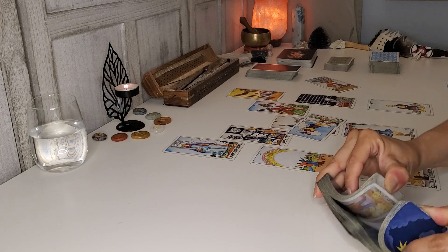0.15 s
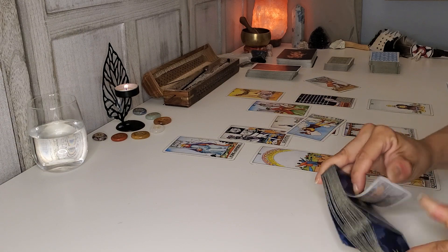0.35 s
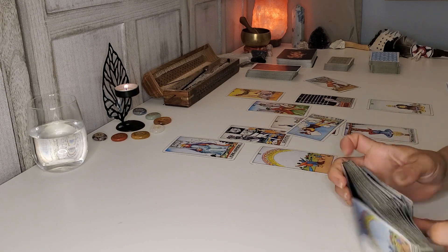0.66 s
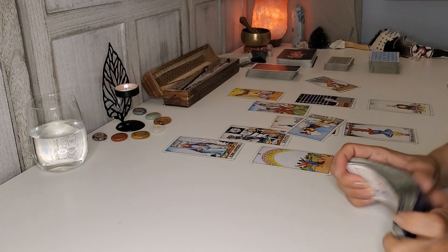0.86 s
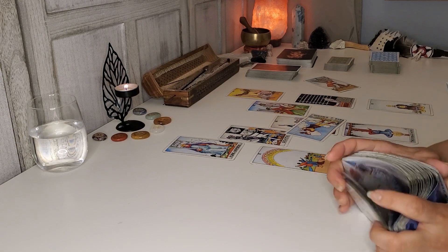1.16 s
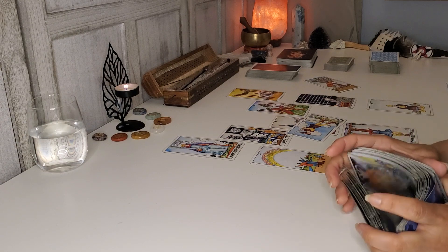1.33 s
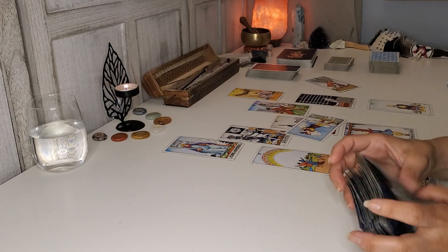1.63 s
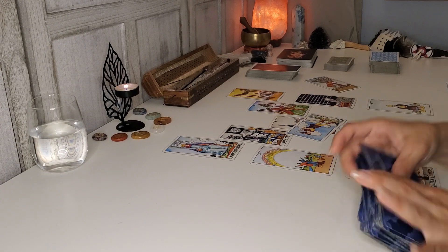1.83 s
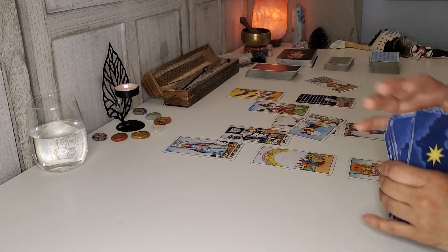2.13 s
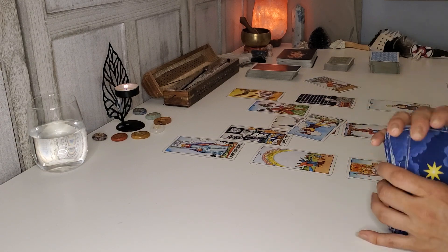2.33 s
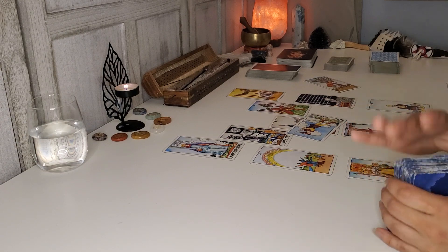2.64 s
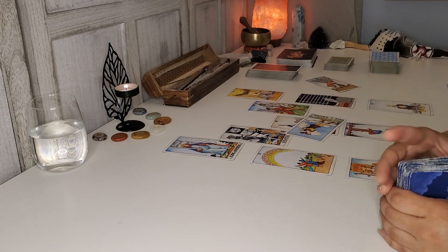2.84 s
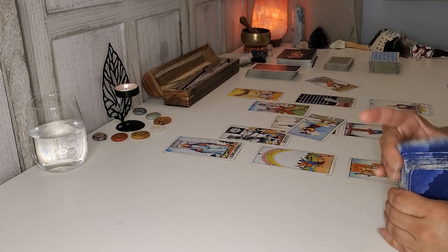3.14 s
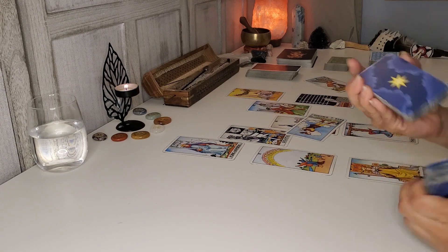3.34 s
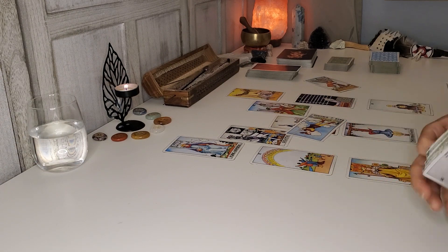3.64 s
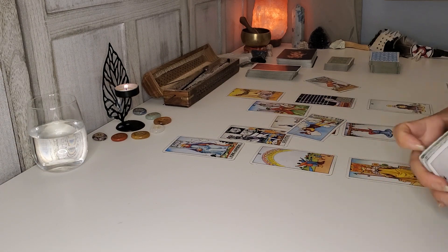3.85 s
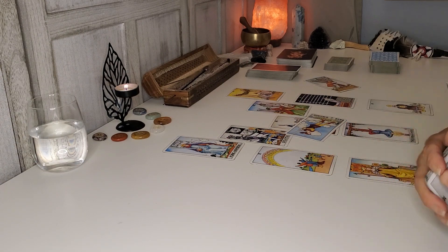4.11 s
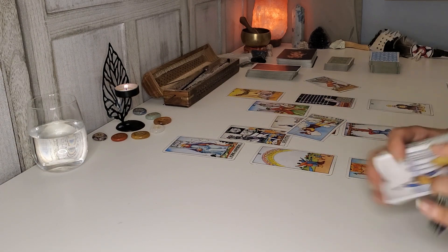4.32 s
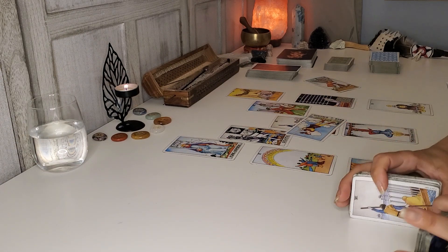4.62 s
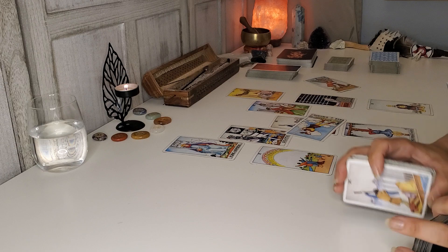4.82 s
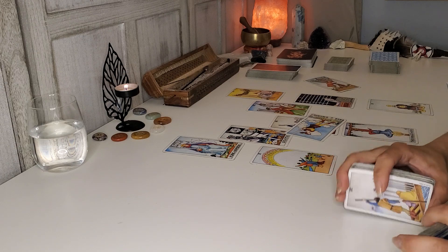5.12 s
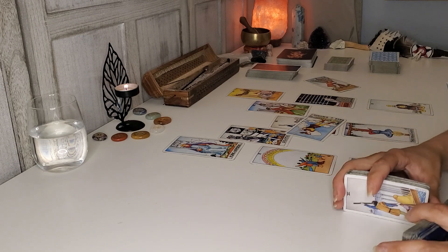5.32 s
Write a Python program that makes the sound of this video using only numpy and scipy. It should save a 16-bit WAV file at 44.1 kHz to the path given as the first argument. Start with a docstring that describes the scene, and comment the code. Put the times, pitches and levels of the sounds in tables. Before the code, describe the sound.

Close stereo pickup of hands shuffling stiff cards at a table in a small furnished room. A loud crisp riffle comes first, then a knock, a much softer bridge flutter, small squaring taps, a quiet pause, and more taps ending in hard sharp raps. A faint low appliance hum and soft room air lie beneath.

```python
"""A deck of stiff cards is riffled, bridged, squared and knocked on a table top in a small furnished room.
Card edges, sliding faces and raps are all made of short noisy slips; each edge and rap also has one snap.
The raps make a few table tones ring. Random echoes make the room; soft noise is its air.
An appliance hums far off as two wavering tones. Two spaced microphones hear the hands move side to side."""
import sys
import numpy as np
from scipy import signal
from scipy.fft import rfft, irfft
from scipy.io import wavfile
from scipy.ndimage import uniform_filter1d

SR = 44100
rng = np.random.default_rng(int(sys.argv[2]) if len(sys.argv) > 2 else 0)


def generate_wav(sig):
    """Save sig (samples, or channels by samples) to the path in sys.argv[1] as 16-bit PCM at SR."""
    pcm = np.round(np.clip(np.atleast_2d(sig).T, -1, 1) * 32767).astype(np.int16)
    wavfile.write(sys.argv[1], SR, pcm)


N = 241353

# Cards sliding, first the riffle, then the bridge falling shut; for each a curve of: start_s, rustle_db
SLIDE_CURVES = [
    [(0, -31.5), (.16, -35.5), (.26, -30), (.33, -43.5), (.4, -23), (.47, -36), (.53, -52)],
    [(1.08, -55.5), (1.2, -50.5), (1.36, -46.5), (1.5, -50.5), (1.65, -48.5), (1.79, -63)],
]
# Card edges let go by the thumb: start_s, level_db (of the middle part)
EDGE_FLICKS = [(0.0234, -22), (0.0662, -22.5), (0.0717, -27.5), (0.122, -28), (0.162, -30), (0.176, -20),
               (0.2123, -20), (0.2474, -21), (0.2676, -25.5), (0.274, -26), (.334, -26), (0.353, -30),
               (0.3711, -22), (0.4814, -23.5), (1.1012, -38.5), (1.16, -46.5), (1.1979, -60), (1.253, -38),
               (1.322, -36), (1.336, -37.5), (1.3738, -40), (1.4093, -46), (1.508, -47), (1.597, -52),
               (1.649, -51), (1.6751, -40.5), (1.6967, -44)]
# The pack raps the table or the palm: start_s, crack_db, dull_db, fade_s
PACK_RAPS = [(0.0297, -18, -24.5, 0.0059), (0.1456, -24, -36, .003), (0.198, -19.5, -27, 0.0048),
             (0.6603, -51, -45, 0.036), (0.698, -44, -42.5, 0.03), (0.7362, -16.5, -37.5, 0.0026),
             (1.235, -46, -39.5, 0.011), (1.51, -43, -42.5, 0.0092), (2.293, -38, -30.5, 0.014),
             (2.312, -23, -35, 0.005), (2.356, -34.5, -34, 0.016), (2.393, -32.5, -32.5, 0.0047),
             (2.478, -38.5, -37, 0.0098), (2.501, -26.5, -37, 0.047), (2.541, -24, -25.5, 0.01),
             (2.7416, -55, -42, 0.0041), (2.7832, -37, -35, 0.0052), (4.544, -36, -28.5, 0.0061),
             (4.56, -24.5, -26.5, 0.0095), (4.643, -26.5, -37.5, 0.011), (4.7092, -45, -32.5, 0.015),
             (4.735, -25, -31.5, 0.0039), (4.746, -25.5, -38.5, 0.0059), (4.8212, -32, -49, 0.0051),
             (5.009, -64, -50, 0.0054), (5.028, -55, -38, 0.043), (5.0749, -9, -23.5, 0.0062),
             (5.0884, -12.5, -23, 0.0038), (5.3193, -26.5, -22.5, 0.0085), (5.326, -14.5, -30.5, 0.0075)]
# Fingers brush the cards: middle_s, rustle_db, hiss_db, length_s
FINGER_BRUSHES = [(0.803, -62.5, -67, 0.41), (0.966, -58, -57, .15), (1.876, -59.5, -59.5, 0.066),
                  (2.132, -70.5, -67.5, 0.15), (2.545, -52, -53.5, 0.063), (2.697, -65, -72, 0.27),
                  (3.123, -83.5, -101.5, 0.2), (3.393, -61, -62, 0.057), (3.619, -76.5, -75.5, 0.14),
                  (3.932, -74, -81, .05), (4.158, -67.5, -69.5, 0.064), (4.887, -53, -64, 0.048)]
# Hands shift on the table: middle_s, rumble_db, length_s
HAND_SHIFTS = [(0.166, -36, 0.21), (0.424, -33, 0.15), (.9, -66, 0.52), (1.234, -54.5, 0.29),
               (1.6, -60.5, 0.53), (2.43, -57.5, 0.24), (2.945, -62, 0.86), (4.735, -46, 0.24)]
# Tones that ring in the table and pack: pitch_hz, relative_level_db, time_to_fall_60_db_s
TABLE_TONES = [(86.7, -1, 0.14), (250, -11, 0.11), (372, -12.5, 0.15), (505, -12, 0.033), (602, 6.5, 0.036),
               (847, -10.5, 0.053)]
# Where the hands are: start_s, left_microphone_delay_ms (below zero, the left hears them first)
HAND_SIDE = [(0, .18), (1.95, .18), (2.25, -.29), (3.1, -.29), (3.3, .22), (4.3, .22), (4.5, -.29)]
# How long the room rings: pitch_hz, time_to_fall_60_db_s
ROOM_RING = [(100, 0.56), (420, 0.32), (1100, 0.3), (2900, 0.28), (7700, 0.33), (15000, 0.3)]
# Loudness of the far hum: start_s, low_tone_db, high_tone_db
HUM_LEVELS = [(0, -51, -51), (1.3, -48.5, -57.5), (2.2, -65.5, -57), (2.7, -50.5, -57), (3.3, -46.5, -58.5),
              (4.0, -51.5, -60.5), (4.5, -59, -60), (5.47, -61, -57.5)]

# Tone colours; only the shape counts. Columns in each: pitch_hz, relative_level_db (per Hz)
# Rustle of the pack
RUSTLE_COLOUR = [(400, -21.5), (800, -7), (2000, -7), (4000, -5.5), (6000, -10.5), (8600, -25.5),
                 (14000, -34)]
# Hiss of card faces, also the sharp part of a flick
FACE_COLOUR = [(4000, -19), (7000, 1.5), (8000, -0.5), (10000, -1), (13000, -1), (16500, -2)]
# Crack of a rap
CRACK_COLOUR = [(400, -24.5), (800, -4), (2300, -5), (4000, -14.5), (6000, -26.5), (8000, -41),
                (16000, -48)]
# Dull thud and hand rumble
RUMBLE_COLOUR = [(30, -49), (50, -15.5), (90, 1.5), (240, 0.5), (500, 0.5), (900, -4), (1500, -13),
                 (3000, -40)]
# Air of the room
AIR_COLOUR = [(25, -14.5), (60, -1), (130, -9.5), (240, -7.5), (340, -15.5), (900, -23), (1600, -33),
              (5000, -43.5), (6600, -39), (8000, -44), (16000, -47)]

FLICK_FADE_S, FLICK_RISE_S, RAP_RISE_S = 0.0013, 0.000077, 0.00074
FLICK_DULL_DB, FLICK_SHARP_DB = -18, -1   # against the middle part
SNAP_AFTER_S, FLICK_SNAP, RAP_SNAP = .0012, 22, 11   # snap heights are against the slips
FULL_SNAP_FADE_S = 0.005   # contacts that fade slower than this are softer: a weaker snap
SMALL_FLICKS_PER_S = 70   # while cards slide
SMALL_FLICK_DB, SMALL_FLICK_SPREAD_DB = 5.5, 13.5   # the strongest against the rustle; range below it
SLIDE_HISS_DB = -8   # against the rustle
FIDGET_MS = .03   # the hands never keep quite still
SPACING_M = 0.19   # between the microphones
ROOM_DB, AIR_DB = 1, -59
NEAR_ECHO_DB, NEAR_ECHO_FADE_S = 3, 0.014   # the table and the nearest wall answer first
HUM_LOW_HZ, HUM_HIGH_HZ = 59.3, 240
CUTOFF_HZ = 16500


def sliding():
    """Sliding cards rustle, their faces hiss and the hands rumble: three colours of uneven noise."""
    t = np.arange(N) / SR
    pressure = np.zeros(N)
    for rows in SLIDE_CURVES:
        while_sliding = (t >= rows[0][0]) * (t < rows[-1][0])
        pressure += from_db(in_time(rows)[0]) * while_sliding
    rustle = pressure * scratchy(2.4, 6.0)
    hiss = pressure * from_db(SLIDE_HISS_DB) * scratchy(1.5, 0.87)

    brush_rustle, brush_hiss = np.zeros((2, N))
    for middle_s, rustle_db, hiss_db, length_s in FINGER_BRUSHES:
        brush = swell(middle_s, length_s)
        brush_rustle += from_db(rustle_db) * brush
        brush_hiss += from_db(hiss_db) * brush
    rustle += brush_rustle * scratchy(2.9, 1.2)
    hiss += brush_hiss * scratchy(1.5, 1.1)

    shifts = sum(from_db(db) * swell(middle_s, length_s) for middle_s, db, length_s in HAND_SHIFTS)
    rumble = shifts * scratchy(0.34, 1.1)
    return colour(rustle, RUSTLE_COLOUR) + colour(hiss, FACE_COLOUR) + colour(rumble, RUMBLE_COLOUR)


def flicking():
    """Card edges flick past the thumbs, each with a middle, a dull and a sharp part."""
    events = []
    for s, db in list(EDGE_FLICKS) + small_flicks():
        events.append((s, FLICK_FADE_S, db, db + FLICK_DULL_DB, db + FLICK_SHARP_DB))
    return contacts(events, FLICK_RISE_S, RUSTLE_COLOUR, FLICK_SNAP)


def small_flicks():
    """Lesser card edges go at random moments while the cards slide."""
    flicks = []
    for rows in SLIDE_CURVES:
        s, db = np.transpose(rows)
        duration = s[-1] - s[0]
        moment, weakness = rng.random((round(SMALL_FLICKS_PER_S * duration), 2)).T
        when = s[0] + moment * duration
        level_db = np.interp(when, s, db) + SMALL_FLICK_DB - SMALL_FLICK_SPREAD_DB * weakness
        flicks += zip(when, level_db)
    return flicks


def rapping():
    """The pack raps the table or the palm, with a crack and a dull part."""
    events = [(s, fade_s, crack_db, dull_db) for s, crack_db, dull_db, fade_s in PACK_RAPS]
    return contacts(events, RAP_RISE_S, CRACK_COLOUR, RAP_SNAP)


def contacts(events, rise_s, spectrum, snap):
    """Each contact is a dying burst of slips with one snap in it; its dull part drives the table."""
    force = np.zeros((3, N))   # middle, dull, sharp
    t = np.arange(2400) / SR
    for s, fade_s, *levels_db in events:
        start, parts = round(s * SR), len(levels_db)
        shape = (1 - np.exp(-t / rise_s)) * np.exp(-t / max(fade_s, .0003))
        burst = slips(shape, parts)
        snap_height = snap * min(1, FULL_SNAP_FADE_S / fade_s)
        burst[:, round(SNAP_AFTER_S * SR)] += snap_height * rng.choice([-1, 1])
        force[:parts, start:start + len(t)] += from_db(levels_db)[:, None] * burst
    middle, dull, sharp = force
    return colour(middle, spectrum) + table_top(dull) + colour(sharp, FACE_COLOUR)


def slips(shape, count):
    """Bursts of slips that follow a shape, evened out so that no pitch stands out."""
    burst = shape * rng.standard_normal((count, len(shape)))
    for _ in range(3):
        spectrum = rfft(burst)
        burst = irfft(spectrum / (np.abs(spectrum) + 1e-12), len(shape))   # all pitches equal
        size = np.sqrt(uniform_filter1d(burst ** 2, size=64) + 1e-12)
        burst = shape * burst / size   # back to the shape
    return burst


def scratchy(spread_db, lumps_db):
    """Dense uneven slips of card on card, coming in lumps."""
    uneven_db = spread_db * np.minimum(rng.exponential(1, N), 5)
    sizes = from_db(uneven_db + lumps_db * drift(56))
    return rms_one(sizes * rng.standard_normal(N))


def table_top(force):
    """The table and the pack ring briefly at a few pitches, over a dull thud."""
    out = colour(force, RUMBLE_COLOUR)
    for hz, level_db, t60 in TABLE_TONES:
        r = from_db(-60 / (t60 * SR))   # what is left after one sample
        w = 2 * np.pi * hz / SR
        ring = signal.lfilter([0, np.sin(w)], [1, -2 * r * np.cos(w), r * r], force + 1e-18)
        out += from_db(level_db - 28) * ring
    return out


def two_microphones(cards):
    """Sound takes time to travel, so it reaches the nearer microphone first."""
    late_ms = in_time(HAND_SIDE)[0] + FIDGET_MS * drift(4)
    late = np.round(late_ms * SR / 1000).astype(int)
    left = cards[np.clip(np.arange(N) - late, 0, N - 1)]
    return np.array([left, cards])


def room(x, size=4000):
    """The cards keep moving, so about each tenth of a second meets another of twelve echo patterns."""
    out = np.zeros((2, N + SR))
    patterns = [echoes() for _ in range(12)]
    fade = np.sqrt(signal.windows.hann(2 * size, sym=False))   # neighbours overlap
    padded = np.pad(x, (size, 2 * size))
    for k, start in enumerate(range(0, N + size, size)):
        piece = padded[start:start + 2 * size] * fade
        wet = signal.fftconvolve(piece[None], patterns[k % 12], axes=1)
        out[:, start:start + wet.shape[1]] += wet
    return out[:, size:size + N]


def echoes():
    """Echoes from all sides: a strong early cluster, then a tail that dies at its own speed in each band."""
    t = np.arange(SR // 3) / SR
    edges = 40 * 2. ** np.arange(10)   # Hz, an octave apart
    noise, tail = diffuse(len(t)), 0
    for k, (low, high) in enumerate(zip(edges, edges[1:])):
        octave = signal.butter(2, [low, high], "band", fs=SR, output="sos")
        band = signal.sosfilt(octave, noise)
        fade = from_db(-60 * t / at_hz(ROOM_RING, np.sqrt(low * high)))
        tail = tail + (-1) ** k * band * fade   # signs alternate: no gaps between bands
    near = 1 + from_db(NEAR_ECHO_DB) * np.exp(-t / NEAR_ECHO_FADE_S)
    tail = tail * (1 - np.exp(-t / 0.00045)) * near
    return tail / np.sqrt(np.sum(tail ** 2) / 2)


def room_air():
    """Soft steady noise of the air, coming from all sides."""
    sides = diffuse(N + 1)[:, :N]   # one spare sample makes the length even
    return from_db(AIR_DB) * np.array([colour(side, AIR_COLOUR) for side in sides])


def diffuse(length):
    """White noise from all sides: alike at both microphones in the bass, unrelated in the treble."""
    hz = np.fft.rfftfreq(length, 1 / SR)
    alike = np.sinc(2 * hz * SPACING_M / 343)   # 343 m/s: speed of sound
    mid, side = rfft(rng.standard_normal((2, length)))
    shared = np.sqrt(.5 + alike / 2) * mid
    opposed = np.sqrt(.5 - alike / 2) * side * [[1], [-1]]
    return irfft(shared + opposed, length)


def hum():
    """A far appliance hums: two tones waver in level and pitch, the same at both microphones."""
    low_db, high_db = in_time(HUM_LEVELS)
    t = np.arange(N) / SR
    low_gain = from_db(low_db + 0.49 * drift(6))
    high_gain = from_db(high_db + 2.5 * drift(8))
    low = low_gain * np.sin(2 * np.pi * HUM_LOW_HZ * t + .25 * drift(3))
    high = high_gain * np.sin(2 * np.pi * HUM_HIGH_HZ * t + .6 * drift(2.4))
    return low + high


def swell(middle_s, length_s):
    """A smooth rise and fall around a moment."""
    return np.exp(-(2 * (np.arange(N) / SR - middle_s) / length_s) ** 2)


def drift(rate_hz):
    """Slow random wander with an rms of about 1."""
    r = np.exp(-2 * np.pi * rate_hz / SR)
    noise = rng.standard_normal(N + SR)
    return rms_one(signal.lfilter([1], [1, -2 * r, r * r], noise)[SR:])   # first second: settling


def colour(x, spectrum):
    """Filters to a tone colour without looking ahead (minimum phase); white noise keeps its rms."""
    gain = from_db(at_hz(spectrum, np.fft.rfftfreq(4096, 1 / SR)))
    fold = irfft(np.log(rms_one(gain)))
    fold[1:2048] *= 2   # folding the log spectrum's second half
    fold[2049:] = 0     # onto its first puts the response after time zero
    response = irfft(np.exp(rfft(fold)))
    return signal.fftconvolve(x, response)[:len(x)]


def at_hz(points, hz):
    """Reads a table at a pitch, on a log-frequency axis."""
    table_hz, values = np.array(points)[:, :2].T
    return np.interp(np.log(hz + 1), np.log(table_hz), values)


def in_time(rows):
    """Columns of a curve table, one value a sample."""
    s, *columns = np.transpose(rows)
    return [np.interp(np.arange(N) / SR, s, c) for c in columns]


def rms_one(x):
    """Scales to unit rms."""
    return x / np.sqrt(np.mean(x ** 2) + 1e-20)


def from_db(db):
    """Decibels to gain."""
    return 10 ** (np.asarray(db) / 20)


def scene():
    """The cards come straight to the microphones; the room, its air and the hum surround them."""
    cards = sliding() + flicking() + rapping()
    direct = two_microphones(cards)
    return direct + from_db(ROOM_DB) * room(cards) + room_air() + hum()


def record(dry):
    """The deepest bass is lost, the highest peaks are rounded, the top is cut."""
    bass_cut = signal.butter(3, 45, "high", fs=SR, output="sos")
    top_cut = signal.cheby2(18, 80, CUTOFF_HZ, fs=SR, output="sos")
    thin = signal.sosfilt(bass_cut, dry)
    rounded = 1.5 * np.tanh(thin / 1.5)
    return signal.sosfilt(top_cut, rounded)


dry = scene()
out = record(dry)
generate_wav(out)
```